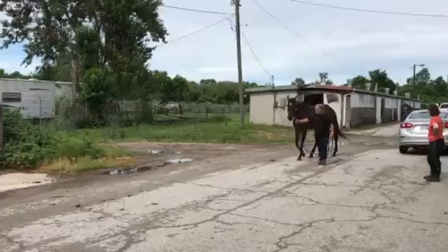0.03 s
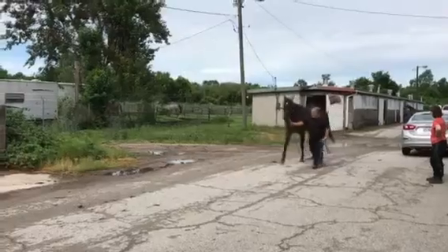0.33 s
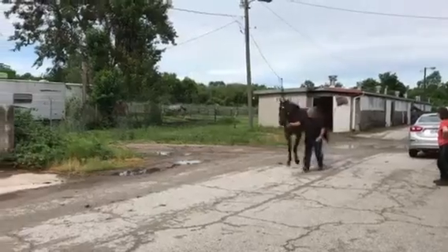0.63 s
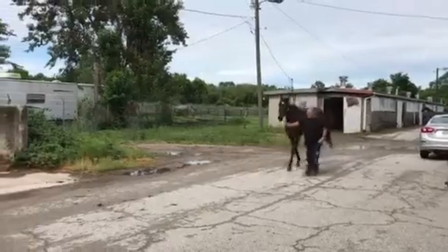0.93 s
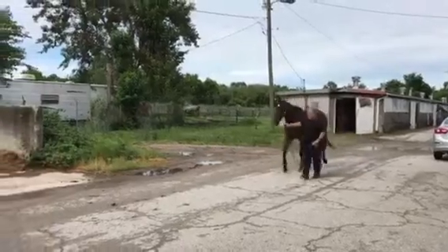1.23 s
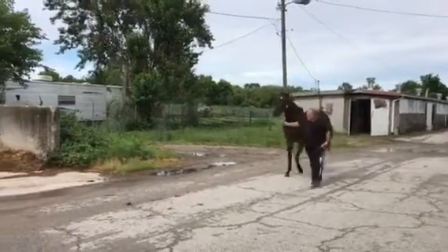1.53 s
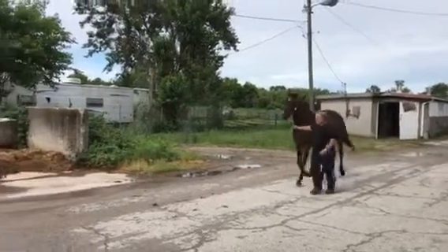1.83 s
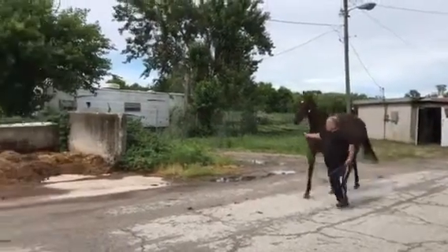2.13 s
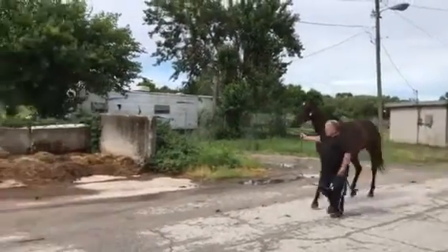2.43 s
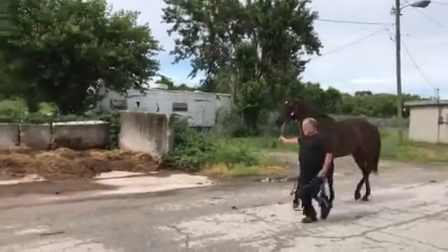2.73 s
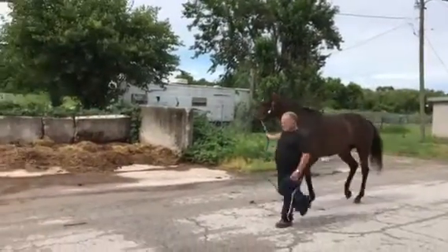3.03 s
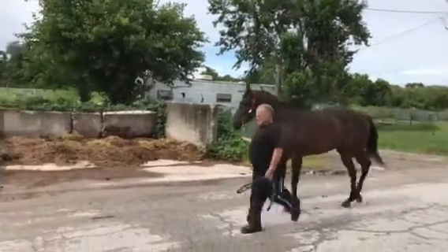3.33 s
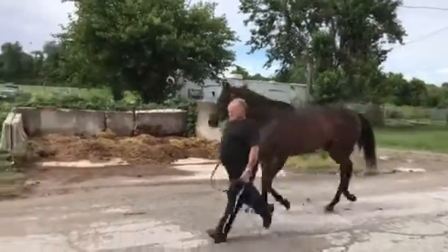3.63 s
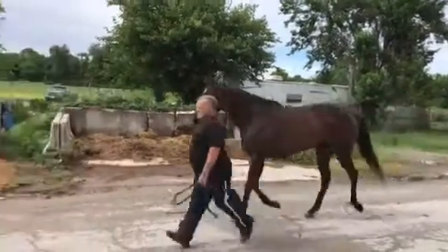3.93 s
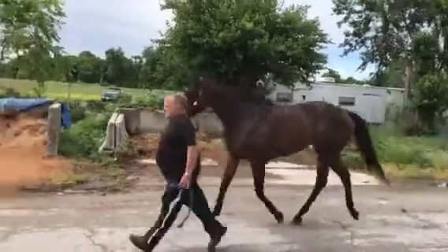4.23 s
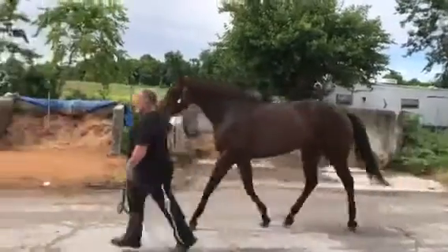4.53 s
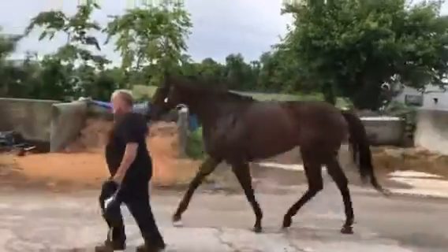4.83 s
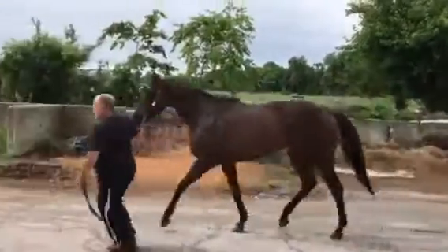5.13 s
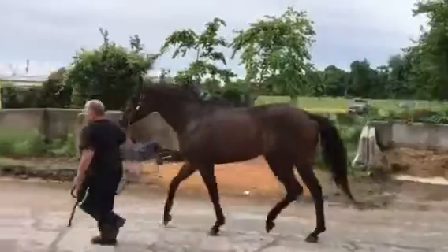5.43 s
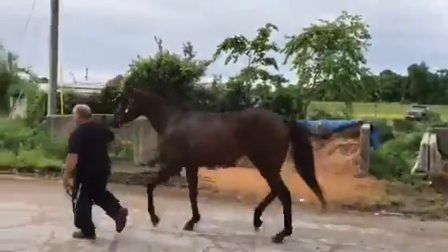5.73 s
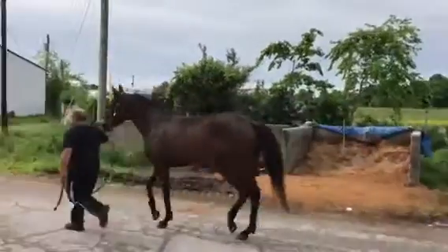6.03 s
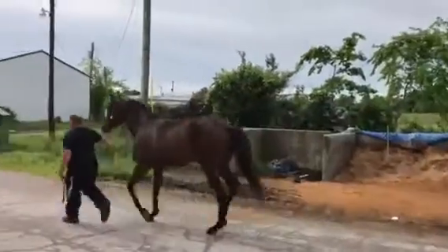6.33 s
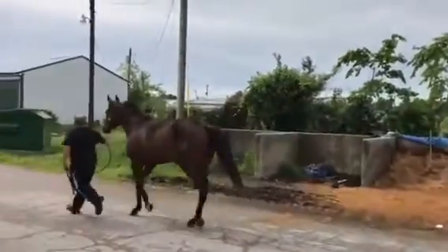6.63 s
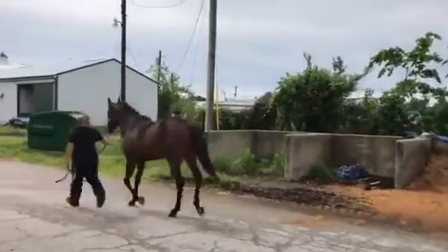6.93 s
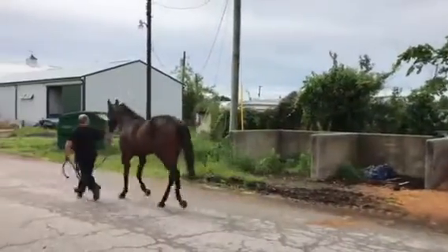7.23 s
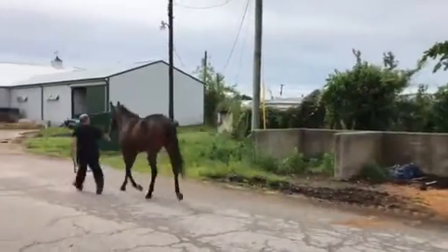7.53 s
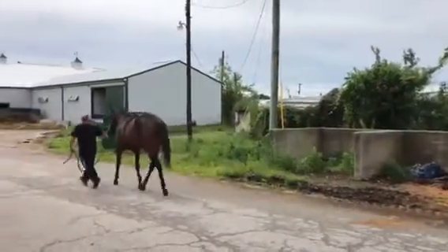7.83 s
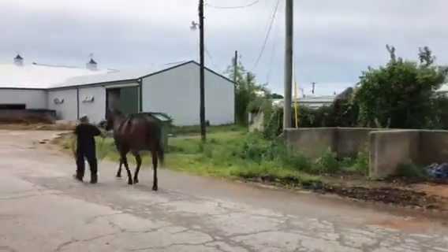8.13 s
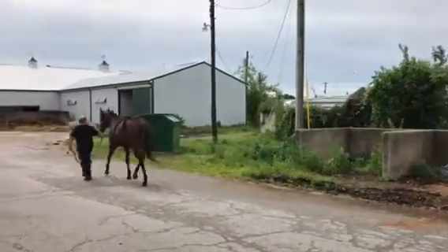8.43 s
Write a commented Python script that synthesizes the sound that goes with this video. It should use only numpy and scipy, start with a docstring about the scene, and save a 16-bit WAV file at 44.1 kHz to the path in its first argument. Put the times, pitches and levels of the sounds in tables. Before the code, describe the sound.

Steady, hollow hoofbeats crunch on pavement outdoors, joined by chirping sparrows, light metal clinks and occasional boot steps.

```python
"""Hoofbeats of a led horse trotting past on cracked pavement in a farmyard.
Each beat is a cluster of rim strikes that ring the hoof and crush grit, plus a hollow clop as the
sole lands flat; some crack a stone. Sparrows chirp among the sheds, the lead's clip clinks and the
handler's boots slap and scuff. Something hisses in spurts, and a far rumble lies below."""
import sys
import numpy as np
from scipy import signal
from scipy.fft import rfft, irfft
from scipy.io import wavfile
from scipy.ndimage import uniform_filter1d

SR = 44100
rng = np.random.default_rng(int(sys.argv[2]) if len(sys.argv) > 2 else 0)


def wav_out(sig):
    """Save sig, one row per channel (or a flat mono array), as 16-bit PCM at SR to the path in sys.argv[1]."""
    wavfile.write(sys.argv[1], SR, np.round(np.clip(np.atleast_2d(sig).T, -1, 1) * 32767).astype(np.int16))


N = 378378

# crushed grit spectrum: freq_hz, density_db
GRIT_SPECTRUM = [(100, -19), (500, 4.5), (1500, 8.5), (2600, -2), (3800, 4.5), (5400, 3), (7000, -0.5),
                 (8500, -2.5), (10300, -6.5), (13000, -7.5), (16000, -18)]
# hoof landings; a light row just before a heavy one is the other hoof of the diagonal pair:
# start_s, until_flat_s, until_still_s, toe_vs_full_weight_db, knock_db, grit_db, clop_db, clop_hz
HOOF_LANDINGS = [(.548, 0.02, 0.027, 7.5, -43, -56, -52, 1060),
                 (1.282, 0.0065, 0.033, -0.5, -37, -48, -30, 1050),
                 (1.605, 0.012, .02, -3, -40, -42.5, -22.5, 975),
                 (2.026, 0.0086, 0.037, 0, -41, -46.5, -25.5, 1050),
                 (2.346, .003, 0.026, 8.5, -56, -46.5, -33, 1030),
                 (2.69, 0.015, 0.024, 0, -35.5, -43.5, -26.5, 1066),
                 (3.019, 0.03, 0.039, 1.5, -43.5, -42, -43, 1060),
                 (3.072, .001, 0.011, 3.5, -38, -58, -30, 1000),
                 (3.369, 0.018, 0.037, 0.5, -32.5, -41.5, -26, 1036),
                 (3.703, 0.0094, 0.013, 3, -42, -47, -29, 1000),
                 (3.736, 0.0063, 0.032, 4.5, -35.5, -38.5, -40, 1050),
                 (4.068, 0.011, 0.021, -0.5, -32.5, -38.5, -24, 1193),
                 (4.407, .008, 0.027, -3, -30, -37, -35, 1070),
                 (4.733, 0.019, 0.027, -6.5, -29, -36.5, -18, 1066),
                 (5.016, .002, 0.011, -1, -41.5, -58, -29, 1080),
                 (5.065, 0.0021, 0.021, -2, -29.5, -33.5, -43, 1070),
                 (5.385, 0.0028, 0.01, 2.5, -39, -45, -29, 1090),
                 (5.408, 0.011, 0.025, 7.5, -32.5, -40, -19.5, 1076),
                 (5.675, 0.001, 0.011, 1, -56, -75, -25, 1080),
                 (5.729, 0.0066, 0.024, 2.5, -27, -38.5, -29, 1050),
                 (6.045, 0.0078, .01, -6, -30.5, -37, -23, 1038),
                 (6.057, 0.0052, 0.023, -8, -33, -34.5, -16, 1120),
                 (6.382, 0.0063, 0.032, -5, -28.5, -32.5, -42, 1080),
                 (6.701, 0.022, 0.031, -5, -29.5, -33.5, -21.5, 1090),
                 (7.036, .004, 0.04, -3.5, -28, -34.5, -33, 1100),
                 (7.362, 0.015, 0.034, -5.5, -32, -36.5, -26, 1145),
                 (7.694, 0.0185, 0.04, -5, -29.5, -36.5, -24.5, 1036),
                 (8.018, 0.015, 0.014, 1, -33.5, -46, -21.5, 1032),
                 (8.039, 0.0088, 0.025, 1.5, -37, -34, -25, 1040),
                 (8.364, .005, 0.011, 9.5, -38, -49, -21.5, 1106),
                 (8.383, 0.018, 0.022, 9.5, -39.5, -47, -30.5, 1035)]


def amp(db):
    """Decibels to gain."""
    return 10 ** (np.asarray(db) / 20)


def unit_rms(x):
    """Scale to rms 1."""
    return x / np.sqrt(np.mean(x ** 2) + 1e-20)


def log_interp(points, hz):
    """Interpolate (freq_hz, value) rows over log frequency."""
    freq_hz, value = np.transpose(points)
    return np.interp(np.log(hz + 1), np.log(freq_hz + 1), value)


def add(mix, start_s, sound):
    """Mix a sound in at start_s."""
    part = mix[max(round(start_s * SR), 0):][:len(sound)]
    part += sound[:len(part)]


def colour(x, spectrum, size=2048):
    """Minimum-phase filter of unit energy; clicks keep their sharp front."""
    log_gain = np.log(amp(log_interp(spectrum, abs(np.fft.fftfreq(size, 1 / SR)))))
    taps = np.fft.ifft(np.exp(np.conj(signal.hilbert(log_gain)))).real
    return signal.oaconvolve(x, taps / np.linalg.norm(taps))[:len(x)]


def wander(rate_hz, size):
    """Random drift below rate_hz, rms 1."""
    slow = np.fft.rfftfreq(size, 1 / SR) < rate_hz
    return unit_rms(irfft(rfft(rng.standard_normal(size)) * slow, size))


def resonate(x, hz, width_hz):
    """One resonance, peak gain 1."""
    return signal.lfilter(*signal.iirpeak(hz, hz / width_hz, fs=SR), x)


def narrow_noise(hz, width_hz, size):
    """Noise passed twice through a resonance, rms 1."""
    once = resonate(rng.standard_normal(size), hz, width_hz)
    return unit_rms(resonate(once, hz, width_hz))


def air(level_db=-42.5, lumpy_db=2.42, drift_db=1.0, rumble_hz=250):
    """Open air and far traffic: a lumpy rumble under a steadier wash."""
    # background spectrum: freq_hz, density_db
    spectrum = [(20, -33), (42, -1.5), (70, 5), (105, 0), (180, -9), (290, -12.5), (480, -19), (750, -18.5),
                (1100, -19.5), (1600, -28.5), (2400, -34), (4000, -26.5), (7700, -41.5), (16000, -50)]
    noise = unit_rms(colour(rng.standard_normal(N), spectrum, size=8192))
    low = signal.sosfiltfilt(signal.butter(2, rumble_hz, fs=SR, output="sos"), noise)
    rumble = low * amp(lumpy_db * wander(11, N))
    wash = (noise - low) * amp(drift_db * wander(2.1, N))
    return amp(level_db) * (rumble + wash)


def yard_echo(x, delay_s=0.0098):
    """Scattered echoes off walls and sheds; each band dies at its own rate."""
    # echo decay: freq_hz, t60_s
    decay = [(200, 0.84), (1000, 0.29), (4000, 0.17), (12000, 0.2)]
    taps = rng.standard_normal(SR) * (rng.random(SR) < .06) * (np.arange(SR) > delay_s * SR)
    hz, t, bands = signal.stft(taps, SR, nperseg=256)
    tail = signal.istft(bands * amp(-60 * t / log_interp(decay, hz)[:, None]), SR)[1]
    return signal.oaconvolve(x, tail / np.linalg.norm(tail))[:N]


def chirp(hz, glide_semitones, length_s=.07, warble=0.011, jitter=.008, flutter_db=4, overtone_db=-27):
    """A thin, hoarse, arched slur; the other side of the syrinx adds a weaker, lower voice."""
    u = np.linspace(-1, 1, int(length_s * SR))
    arch_semitones = 3 * rng.uniform(0.597, 1.5)
    pitch_hz = hz * 2 ** ((glide_semitones * u / 2 - arch_semitones * u ** 2) / 12)
    out = np.zeros(len(u))
    for ratio, voice_db in ((1, 0), (.84, -13)):
        waver = 1 + warble * wander(70, len(u)) + jitter * wander(770, len(u))
        phase = 2 * np.pi * np.cumsum(pitch_hz * ratio * waver) / SR
        whistle = np.sin(phase) + amp(overtone_db) * np.sin(2 * phase)
        out += amp(voice_db + flutter_db * wander(150, len(u))) * whistle
    return unit_rms(out) * np.cos(np.pi * u / 2) ** 1.42


def sparrows(chatter_db=-15, chatter_hz=(3105, 4650), spread_s=.11, chatter_count=7):
    """Clear notes, each amid fainter chatter from the flock."""
    # sparrow notes: middle_s, level_db, pitch_hz, glide_semitones
    notes = [(.232, -49.5, 6450, -1.5), (.272, -43.5, 4560, 0.5), (.335, -46.5, 4090, 1),
             (.372, -54, 3100, -6), (.555, -48.5, 3920, -6), (.603, -44.5, 3330, -3), (.78, -49, 4280, -5),
             (.985, -46.5, 4470, -6), (1.053, -44, 3340, -2.5), (1.454, -36.5, 4340, -7),
             (1.53, -39.5, 3820, 2), (1.704, -42.5, 4800, 8.5), (1.77, -45.5, 4140, 0.5),
             (1.835, -54, 3700, 4), (2.094, -48, 6260, 0), (2.125, -40, 4550, 9.5), (2.195, -45, 4200, 4),
             (2.369, -48.5, 3200, -6), (2.606, -45.5, 4750, -3), (2.66, -40.5, 4690, 2.5),
             (2.97, -48, 4020, 3), (3.255, -45.5, 4000, -4.5), (3.875, -45.5, 4400, 1.5),
             (4.263, -43.5, 4550, -6), (4.338, -44, 3590, -0.5), (4.71, -49.5, 3600, -6),
             (4.836, -39.5, 4170, -4), (4.88, -53, 3220, -3.5), (5.31, -48, 4620, 0.5),
             (5.47, -44.5, 3350, -2.5), (5.551, -41.5, 4350, -2), (5.622, -47, 3680, -1),
             (5.84, -45, 3740, -6.5), (5.89, -45.5, 3490, -2.5), (5.955, -50.5, 5030, 7.5),
             (5.996, -41.5, 4550, -6), (6.262, -47.5, 4630, 12.5), (6.333, -50, 4080, 5),
             (6.53, -41, 4110, -8.5), (6.765, -42, 3470, -2.5), (7.115, -46.5, 3370, -2),
             (7.228, -44, 4290, -5), (7.334, -42.5, 4500, 5.5), (7.525, -41, 4640, -2.5),
             (7.599, -45.5, 3400, -2.5), (7.791, -43, 3730, -5.5), (7.842, -48, 3210, -3),
             (8.148, -38.5, 4030, -4.5), (8.28, -47, 3950, -9.5), (8.491, -52, 4200, -7.5),
             (8.548, -41.5, 3535, -3.5)]
    out = np.zeros(N)
    for middle_s, db, hz, glide_semitones in notes:
        call = amp(db) * chirp(hz, glide_semitones)
        start_s = middle_s - len(call) / SR / 2
        add(out, start_s, call)
        for when, pitch, slope in rng.random((chatter_count, 3)):
            chatter = chirp(np.interp(pitch, [0, 1], chatter_hz), 12 * slope - 8)
            add(out, start_s + spread_s * (2 * when - .7), amp(db + chatter_db) * chatter)
    return out


def shifting_resonances(x, depth_db=2.2, frames=16, bins=3):
    """Patches about 250 Hz wide and 90 ms long come and go in a noise."""
    bands = signal.stft(x, nperseg=512)[2]
    patches = uniform_filter1d(rng.standard_normal(bands.shape), frames, axis=1)
    patches = unit_rms(uniform_filter1d(patches, bins, axis=0))
    return unit_rms(signal.istft(bands * amp(depth_db * patches))[1][:len(x)])


def spurt_gains(linger_db_per_s=-10.5, linger_top_db=-3.5):
    """Body, top and rasp gains: each spurt swells, holds, dies and leaves a faint hiss."""
    # hiss spurts: start_s, rise_s, hold_s, t60_s, level_db, top_vs_body_db, linger_db, rasp_db
    spurts = [(1.279, 0.0054, 0.039, 0.17, -38, -1, -55.5, -63),
              (1.399, 0.027, 0.035, 0.49, -42, -9, -70, -67), (1.596, 0.03, 0.069, 1.4, -52, 2.5, -75, -68),
              (2.31, 0.019, .04, 1, -63, -2, -57, -65), (2.663, 0.045, 0.068, 0.87, -43.5, -2.5, -53, -51),
              (4.045, 0.049, 0.04, .7, -49.5, -10, -54.5, -57)]
    t = np.arange(N) / SR
    body, top, rasp = np.zeros((3, N))
    for start_s, rise_s, hold_s, t60_s, db, top_db, linger_db, rasp_db in spurts:
        swell = np.clip((t - start_s) / rise_s, 0, 1)
        after_s = np.maximum(t - start_s - rise_s - hold_s, 0)
        burst = swell * amp(-60 * after_s / t60_s)
        linger = swell * amp(linger_db + linger_db_per_s * after_s)
        body += (burst * amp(db)) ** 2 + linger ** 2
        top += (burst * amp(db + top_db)) ** 2 + (linger * amp(linger_top_db)) ** 2
        rasp += (burst * amp(rasp_db)) ** 2
    return np.sqrt([body, top, rasp])


def hiss(gain_db=3, bright_db=0.5, sputter_db=1.9, grain_db=2.5, split_hz=10000):
    """Spurts of grainy hiss; body, top and a lower rasp sputter independently."""
    # hiss spectrum: freq_hz, density_db
    spectrum = [(300, -14), (1100, -2.5), (2300, -11), (3500, -1.5), (5300, -0.5), (6800, 4), (8600, 2.5),
                (10300, -1.5), (13000, 0), (16000, -14)]
    body_gain, top_gain, rasp_gain = spurt_gains()
    grains = unit_rms(rng.standard_normal(N) * amp(grain_db * np.minimum(rng.exponential(1, N), 5)))
    noise = shifting_resonances(colour(grains, spectrum))
    body = signal.sosfiltfilt(signal.butter(4, split_hz, fs=SR, output="sos"), noise)
    rasp = narrow_noise(hz=3400, width_hz=800, size=N)
    bands = body_gain * body, amp(bright_db) * top_gain * (noise - body), rasp_gain * rasp
    return amp(gain_db) * sum(band * amp(sputter_db * wander(99, N)) for band in bands)


def thump(start_s=1.288, level_db=-29, pitch_hz=220, t60_s=0.069):
    """A dull bump as the first spurt breaks out."""
    t, out = np.arange(SR // 10) / SR, np.zeros(N)
    add(out, start_s, amp(level_db - 60 * t / t60_s) * np.sin(2 * np.pi * pitch_hz * t))
    return out


def loose_grit(level_db=-61, ticks_per_s=20, spread_db=5.5, t60_s=0.071):
    """Small stones tick at random under hooves and boots."""
    t = np.arange(SR // 20) / SR
    ticks = (rng.random(N) < ticks_per_s / SR) * amp(spread_db * np.minimum(rng.exponential(1, N), 3))
    crunch = rng.standard_normal(len(t)) * amp(-60 * t / t60_s)
    return amp(level_db) * colour(signal.oaconvolve(ticks, crunch)[:N], GRIT_SPECTRUM)


def scuffs(clump_db=4):
    """Soles and hoof tips drag; grit catches and slips in clumps."""
    # drags: start_s, length_s, level_db
    drags = [(0.212, .04, -46.5), (.765, 0.052, -46.5), (1.053, 0.032, -52), (1.699, 0.033, -44),
             (1.86, .02, -52), (3.56, 0.022, -49.5), (4.032, 0.032, -41.5)]
    out = np.zeros(N)
    for start_s, length_s, db in drags:
        size = int(length_s * SR)
        grains = unit_rms(rng.standard_normal(size) * amp(clump_db * wander(400, size)))
        add(out, start_s, amp(db) * np.sqrt(np.hanning(size)) * grains)
    return colour(out, GRIT_SPECTRUM)


def boots(t60_s=0.035):
    """The handler's soles slap down: dry bursts, no ring."""
    # slaps and light scuffs: start_s, level_db
    steps = [(.705, -42), (1.674, -29.5), (1.948, -39), (2.944, -43), (3.221, -28), (3.227, -26.5),
             (6.995, -39)]
    # slap spectrum: freq_hz, density_db
    spectrum = [(150, -19), (400, 5), (1300, 6), (2300, 0.5), (3500, -6), (7000, -7), (16000, -21)]
    t, out = np.arange(SR // 20) / SR, np.zeros(N)
    for start_s, db in steps:
        add(out, start_s, amp(db - 60 * t / t60_s) * rng.standard_normal(len(t)))
    return colour(out, spectrum)


def clinks(gain_db=-3, snap_db=-1, snap_t60_s=0.034, vary_db=5, detune=0.027):
    """The lead's metal clip snaps against its ring; each touch stirs its modes differently."""
    # clip touches: start_s, level_db
    touches = [(0.155, -34.5), (0.944, -37), (0.977, -30.5), (1.188, -32), (3.048, -36)]
    # clip modes: freq_hz, level_db, t60_s
    modes = [(5300, -7.5, 0.066), (9840, -17, 0.065), (12800, -8, 0.06), (14800, -13, .08)]
    t, out = np.arange(SR // 6) / SR, np.zeros(N)
    for start_s, db in touches:
        ring = np.zeros(len(t))
        for hz, mode_db, t60_s in modes:
            envelope = amp(mode_db - vary_db * rng.exponential() - 60 * t / t60_s)
            ring += envelope * np.sin(2 * np.pi * hz * (1 + detune * rng.standard_normal()) * t)
        snap = np.diff(rng.standard_normal(len(t) + 1)) / 2 * amp(snap_db - 60 * t / snap_t60_s)
        add(out, start_s, amp(db + gain_db) * (ring + snap))
    return out


def stone_cracks(t60_s=0.012, centre_hz=5000, width_hz=4500):
    """A stone splits under the rim: a very short, bright snap."""
    # splitting stones: start_s, level_db
    cracks = [(4.4167, -25.5), (4.752, -28), (5.0665, -25.5), (5.7386, -24), (6.058, -25), (6.3902, -29),
              (6.7072, -38), (6.718, -32.5), (8.04, -41)]
    t, out = np.arange(SR // 50) / SR, np.zeros(N)
    for start_s, db in cracks:
        noise = rng.standard_normal(len(t))
        snap = unit_rms(resonate(noise, centre_hz * 2 ** rng.uniform(-0.69, 1.0), width_hz))
        add(out, start_s, amp(db - 60 * t / t60_s) * snap)
    return out


def rim_contacts(rocks=3, rock_db=-1, fade_db_per_s=-130, uneven_db=1):
    """Toe touch, full weight, rocking on the rim: yields start_s, moving_s, knock_db, grit_db."""
    for start_s, flat_s, still_s, toe_db, knock_db, grit_db, _, _ in HOOF_LANDINGS:
        yield start_s, flat_s, knock_db + toe_db, grit_db + toe_db
        yield start_s + flat_s, still_s - flat_s, knock_db, grit_db
        for rock_s in still_s * (np.arange(rocks) + .5 + .5 * rng.random(rocks)) / rocks:
            offset_db = rock_db + fade_db_per_s * abs(rock_s - flat_s)
            knock_offset_db, grit_offset_db = offset_db + uneven_db * rng.standard_normal(2)
            yield start_s + rock_s, still_s - rock_s, knock_db + knock_offset_db, grit_db + grit_offset_db


def rim_strikes(knock_gain_db=4.5, rise_s=0.0002, detune=0.074,
                grit_gain_db=1.5, grit_t60_s=0.055, settle_t60_s=0.063, scuff_db=-22, scuff_t60_s=0.85,
                grain_db=2.0, clump_db=3, stone_db=3, stone_hz=3800):
    """Each strike knocks the hoof wall and crushes grit in clumps until the hoof lies still."""
    # hoof modes: freq_hz, level_db, t60_s
    modes = [(309, -15.5, 0.036), (834, -12.5, 0.039), (1077, -1, 0.037), (1362, -8, 0.035),
             (2040, -10, 0.0068)]
    t = np.arange(SR // 8) / SR
    knocks, grit = np.zeros((2, N))
    for start_s, moving_s, knock_db, grit_db in rim_contacts():
        # the contact point shifts the modes
        shifts = 1 + detune * rng.standard_normal(len(modes))
        signs = rng.choice([-1, 1], len(modes))
        ring = sum(sign * amp(db - 60 * t / t60_s) * np.sin(2 * np.pi * hz * shift * t)
                   for (hz, db, t60_s), shift, sign in zip(modes, shifts, signs))
        add(knocks, start_s, amp(knock_db + knock_gain_db) * ring * (1 - np.exp(-t / rise_s)))
        crush = amp(-60 * t / grit_t60_s - 60 * np.maximum(t - moving_s, 0) / settle_t60_s)
        scuff = amp(scuff_db - 60 * t / scuff_t60_s)
        grains = rng.standard_normal(len(t)) * amp(grain_db * np.minimum(rng.exponential(1, len(t)), 4))
        grains *= amp(clump_db * wander(500, len(t)))
        # the stone under the rim pitches each crunch
        grains += amp(stone_db) * resonate(grains, stone_hz * 2 ** rng.uniform(-1.08, 1), width_hz=470)
        add(grit, start_s, amp(grit_db + grit_gain_db) * (crush + scuff) * unit_rms(grains))
    return knocks + colour(grit, GRIT_SPECTRUM)


def clops(gain_db=-2, swell_s=0.0037, ring_db=-17, ring_t60_s=0.13, ring_width_hz=220):
    """The hollow under the sole swells into a short tone as it closes on the ground, then blurs away."""
    t, out = np.arange(SR // 6) / SR, np.zeros(N)
    u = t / swell_s
    ring_envelope = amp(ring_db - 60 * t / ring_t60_s) * (1 - np.exp(-u))
    for start_s, flat_s, *_, db, hz in HOOF_LANDINGS:
        tone = u ** 2 * np.exp(2 * (1 - u)) * np.sin(2 * np.pi * hz * t)
        ring = ring_envelope * narrow_noise(hz, ring_width_hz, len(t))
        add(out, start_s + flat_s, amp(db + gain_db) * (tone + ring))
    return out


def scene(horse_echo_db=-17, bird_echo_db=-6):
    """The horse is close and nearly dry; the birds are farther off and echo more."""
    horse = rim_strikes() + stone_cracks() + clops() + clinks() + boots() + scuffs() + loose_grit()
    birds = sparrows()
    echo = yard_echo(amp(horse_echo_db) * horse + amp(bird_echo_db) * birds)
    mono = horse + birds + echo + hiss() + thump() + air()
    return np.array([mono, mono])


def record(dry, open_s=.119, fade_s=.006, cutoff_hz=16200):
    """The microphone opens at open_s and colours the treble; a low-pass follows."""
    # microphone peaks and dips: centre_hz, width_hz, gain_db
    response = [(7710, 700, -3.5), (9500, 700, 0.5), (10600, 520, -4.5)]
    sound = dry * np.clip((np.arange(N) / SR - open_s) / fade_s, 0, 1)
    for hz, width_hz, db in response:
        sound = sound + (amp(db) - 1) * resonate(sound, hz, width_hz)
    lowpass = signal.firwin(511, cutoff_hz, window=("kaiser", 9), fs=SR)
    return signal.oaconvolve(sound, lowpass[None], "same")


dry = scene()
out = record(dry)
wav_out(out)
```